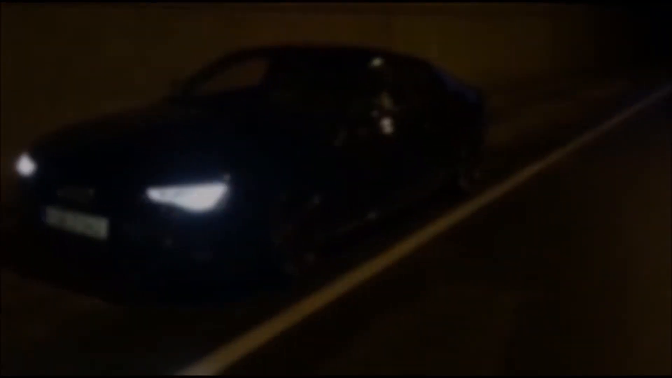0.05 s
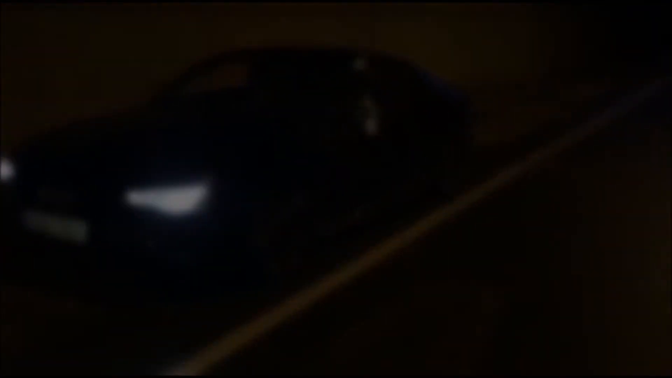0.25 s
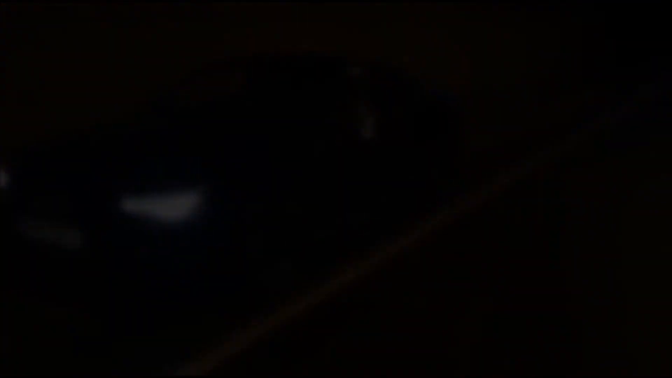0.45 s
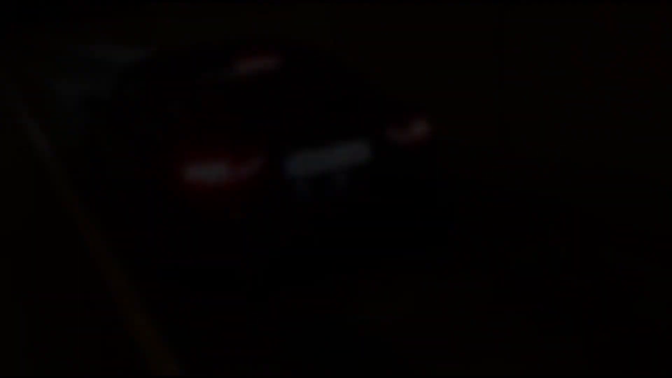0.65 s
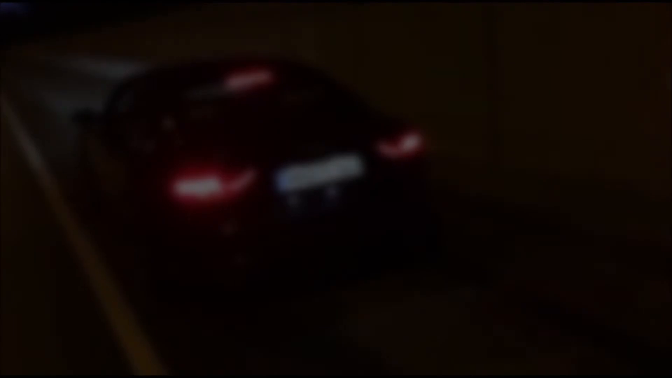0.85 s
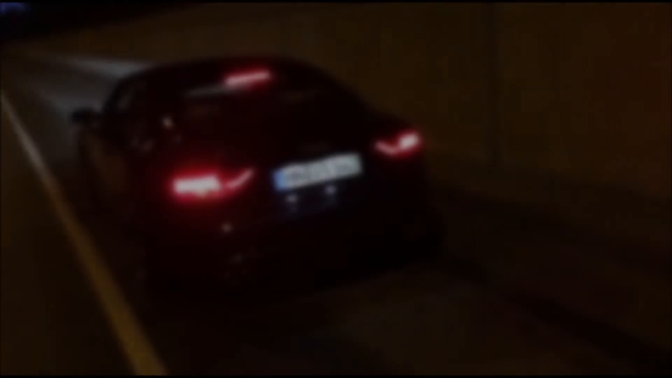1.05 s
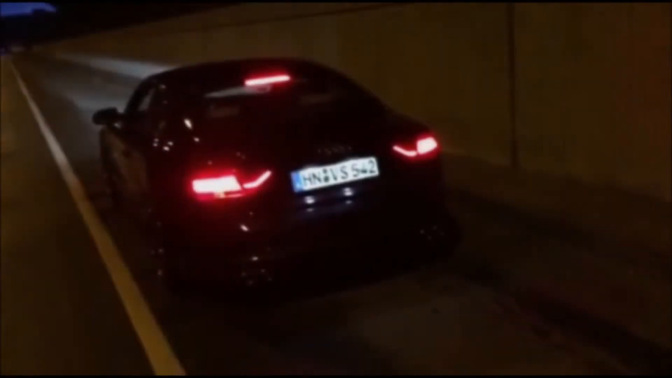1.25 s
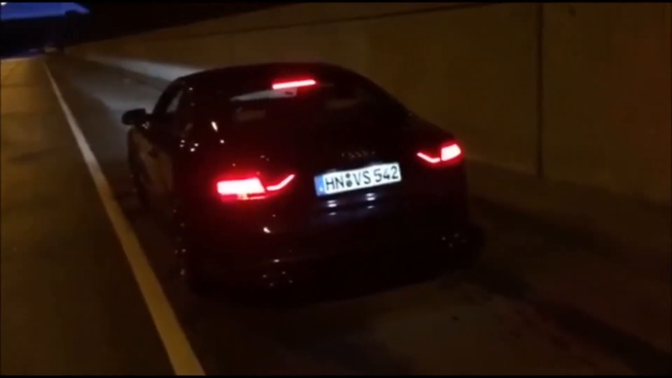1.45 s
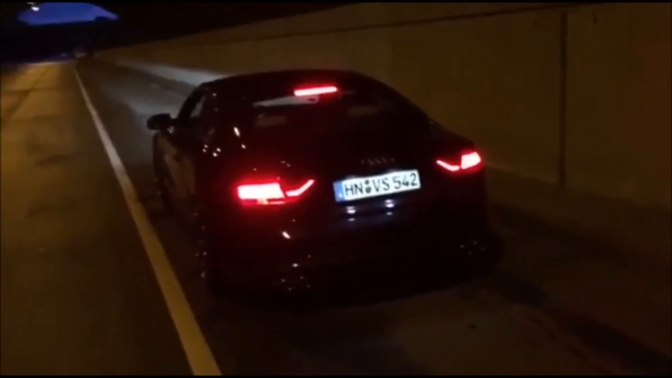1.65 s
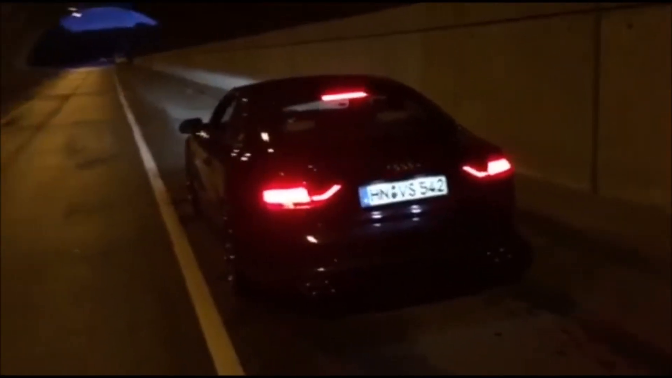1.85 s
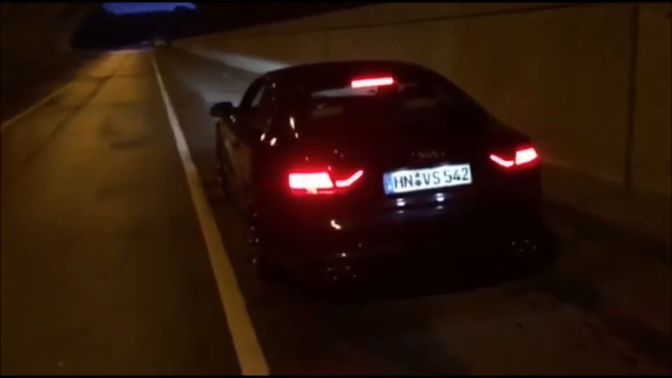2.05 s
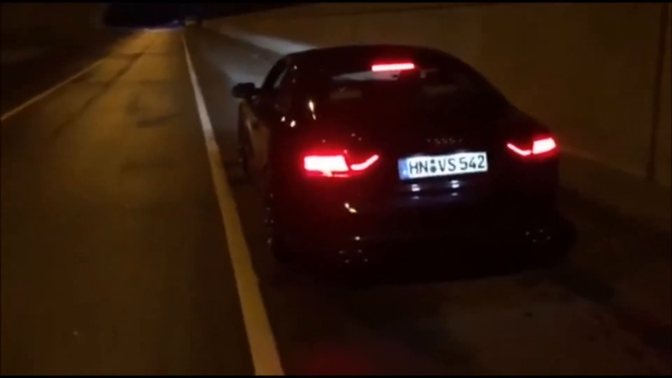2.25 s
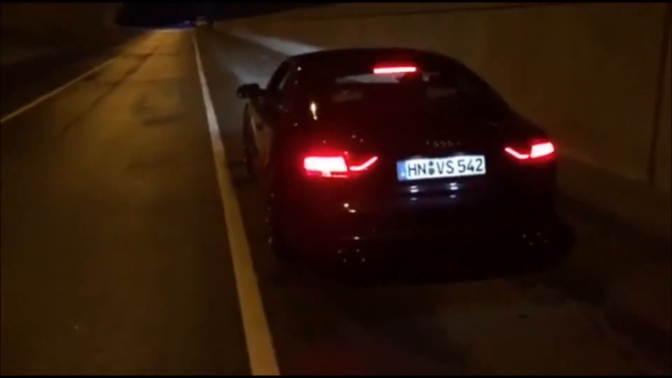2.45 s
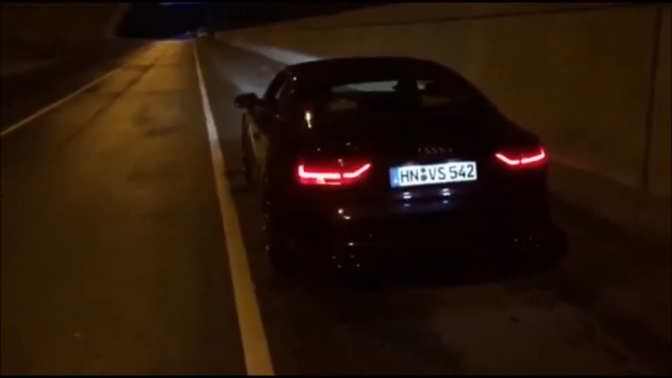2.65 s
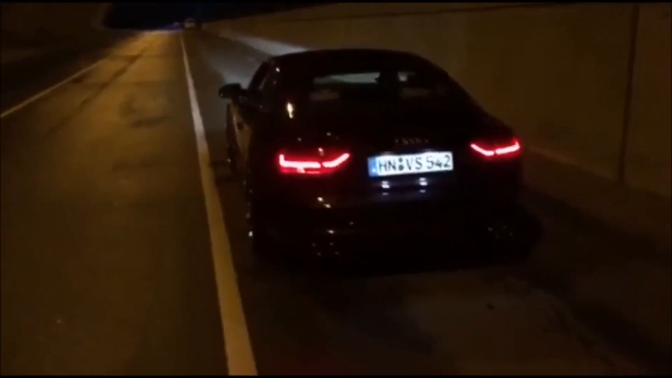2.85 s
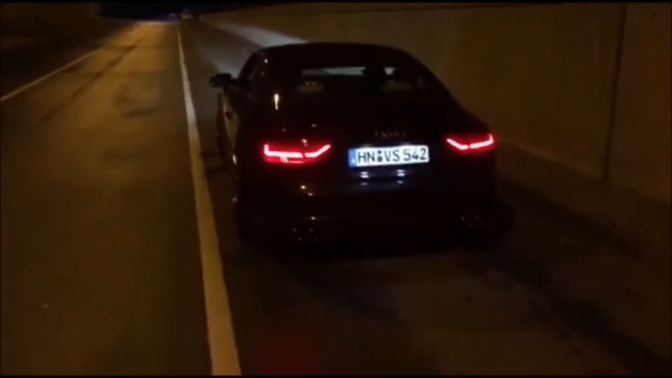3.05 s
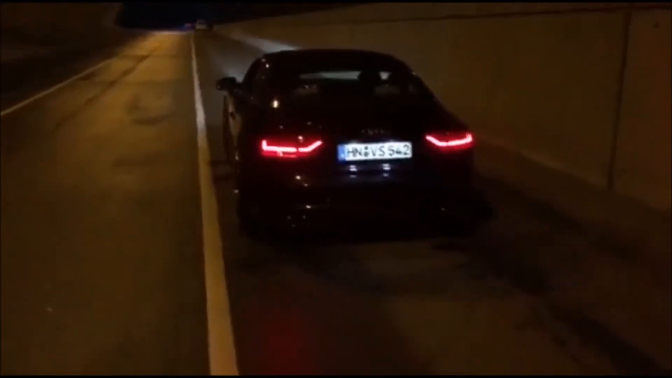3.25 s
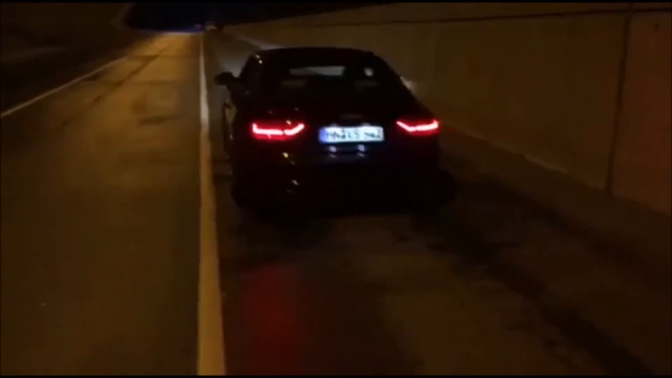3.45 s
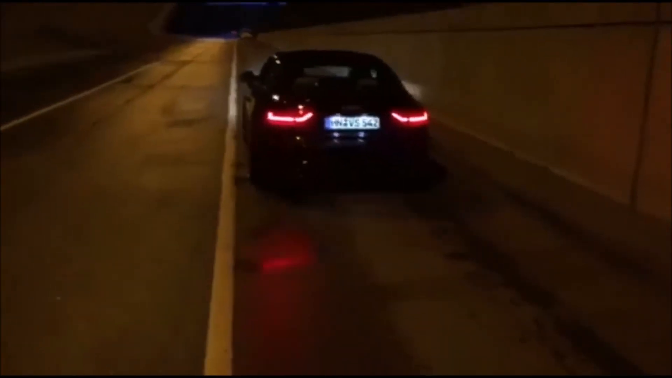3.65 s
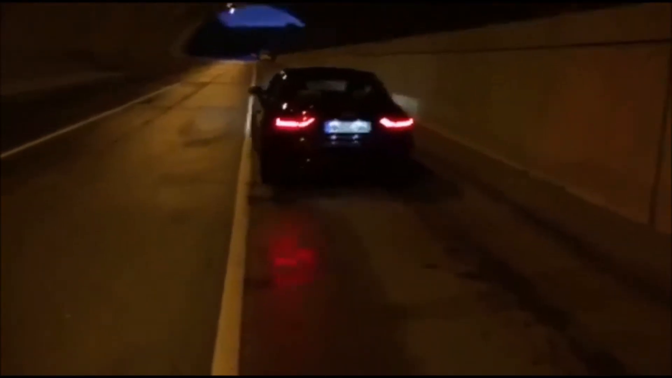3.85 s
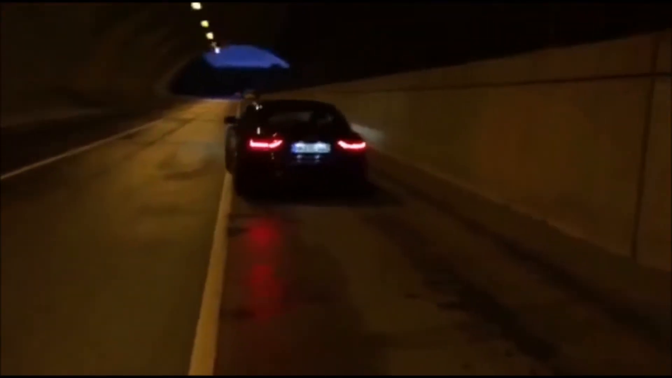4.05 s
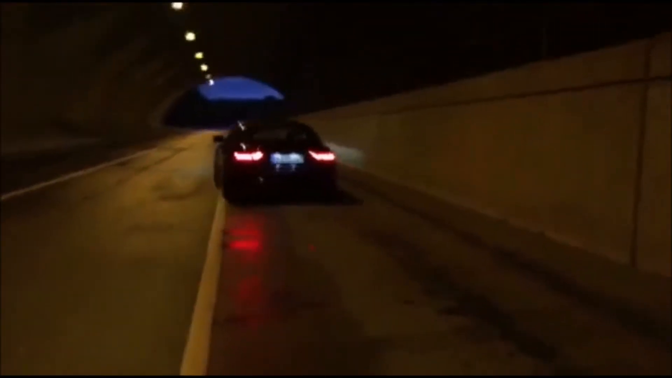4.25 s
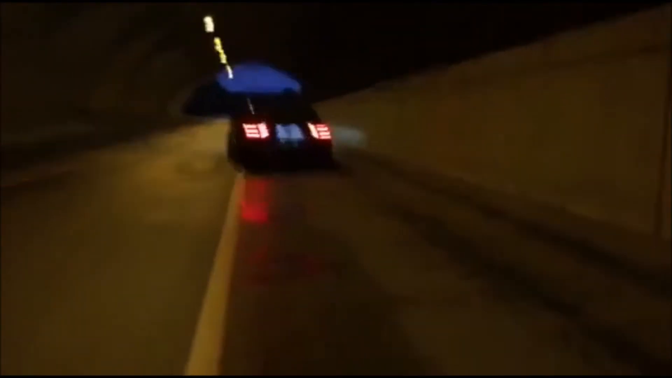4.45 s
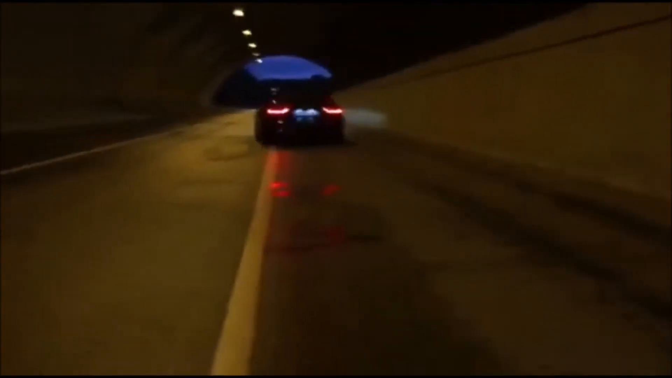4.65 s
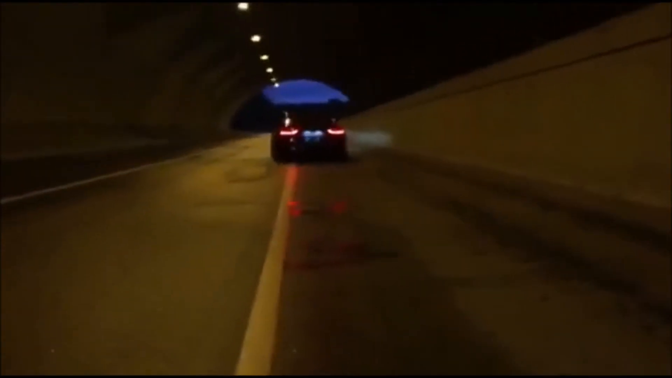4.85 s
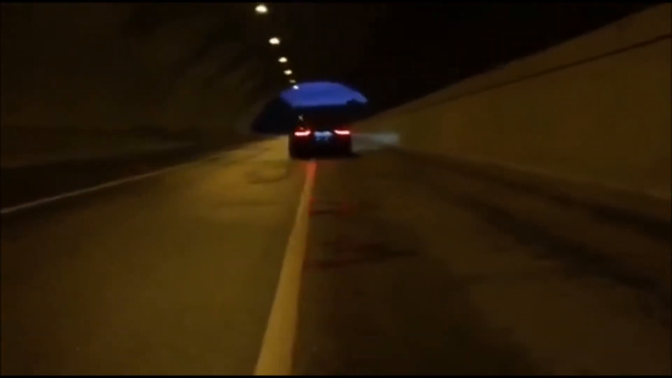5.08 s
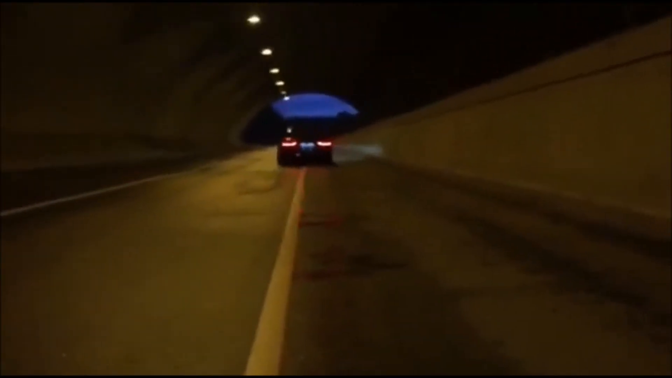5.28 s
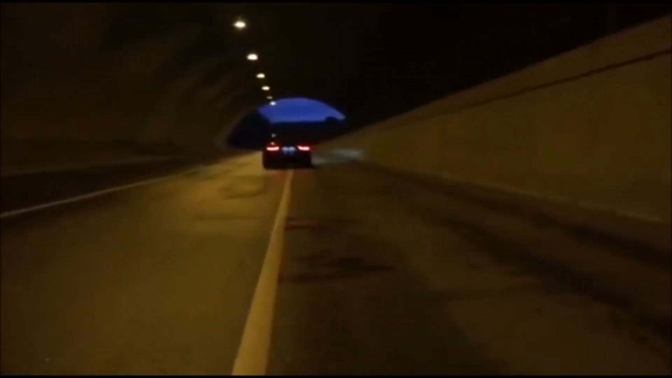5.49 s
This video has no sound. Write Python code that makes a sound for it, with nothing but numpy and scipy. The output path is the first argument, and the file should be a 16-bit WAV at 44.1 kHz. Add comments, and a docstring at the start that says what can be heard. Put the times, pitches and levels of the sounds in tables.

```python
"""A V8 sports car in a road tunnel idles and creeps past the microphone, then pulls away at full throttle. Its
uneven firing makes a stack of orders (multiples of the four-stroke cycle rate), coloured by the pipes. At idle
the exhaust burbles, the engine bay whirrs and metal ticks as the rear comes round to face us. Under load the
gas roars and rasps, the firings spit and some crack. Each crack comes again within a few milliseconds, and the
concrete tube's echo gains on the direct sound as the car draws away."""
import sys
import numpy as np
from scipy import signal
from scipy.fft import rfft, irfft, next_fast_len
from scipy.io import wavfile
from scipy.ndimage import uniform_filter1d, map_coordinates

SR = 44100
rng = np.random.default_rng(int(sys.argv[2]) if len(sys.argv) > 2 else 0)


def output_pcm(signal):
    """Save a mono or channel-first signal as 16-bit PCM at the path in sys.argv[1].

    Samples are clipped to [-1, 1] before scaling.
    """
    pcm = np.clip(np.atleast_2d(signal).T, -1, 1) * 32767
    wavfile.write(sys.argv[1], SR, np.round(pcm).astype(np.int16))


N = 243431
TIME = np.arange(N) / SR

# engine speed in four-stroke cycles a second, eight firings each: (time [s], speed [Hz])
IDLE_SPEED = [(0, 5.25), (.6, 5.3), (1.0, 5.9), (1.25, 5.36), (1.55, 5.36), (1.85, 5.28), (2.45, 5.24),
              (2.75, 5.36)]
TIP_IN_SPEED = [(2.82, 7.1), (2.9, 9.4)]
PULL_SPEED = [(3.0, 12.6), (3.08, 14.9), (3.15, 16.6), (3.23, 18.1), (3.45, 20.9), (3.97, 26.3),
              (4.24, 31.3), (4.49, 33.3), (4.61, 36.2), (5.0, 42.8), (5.43, 49.7), (5.52, 50.3)]
# pressure pulse of each firing in turn, led by the near bank's four uneven cylinders: (level [dB])
PULSE_DB = [-3, -14, 0, -3, -16, -2, -16, -14]
# gas puff of each firing in turn: (level [dB])
PUFF_DB = [-8, -15, -23, -16, -23, -11, -15, -11]
# the puffs trail the pulses at high revs: (speed [Hz], lag [cycles])
PUFF_LAG = [(22, 0), (31, .06)]
# the throttle opens on boom, bark and rasp, a row each: (start [s], full [s])
OPENING = [(2.84, 2.94), (2.888, 2.984), (2.824, 2.984)]
# balance at full throttle: (speed [Hz], boom [dB], bark [dB], rasp [dB])
LOAD = [(12.5, -10.5, -28, -38.5), (16, -11.5, -26, -43), (20, -16, -25, -38.5), (20.6, -13.5, -22, -36),
        (26.8, -17, -20.5, -37), (28.97, -18.5, -17, -33), (39, -21, -17, -30), (48.3, -20, -15.5, -27.5),
        (61.6, -15, -30, -32.5)]
# ragged gas: (speed [Hz], churn under the boom [dB], roar under the bark [dB], treble fizz [dB])
TURBULENCE = [(11.1, -19.5, -1.5, 2), (22, -16.5, -11.5, -9), (36.4, -1, -10, -0.5), (49.4, -7, -7, 2)]
# orders between their swells, from the second up: (level [dB])
ORDER_DB = [-12.5, -6.5, -4, -8.5, -0.5, -17.5, -0.5, 3, -3.5, -11.5, 1, 1, -1.5, -3, -5, 4, -7.5, 1.5, 0.5,
            4, 3, -6.5, -3.5, -3, 6.5, 6, -8.5, 2.5, 6.5, 1, 0, -4, -10.5, 4, 3]
# an order meets a resonance of pipes or tunnel: (order, speed [Hz], half-width [Hz], level [dB])
SWELLS = [(2, 46, 12, 2), (3, 22, 5, 4.5), (4, 27, 2.6, 4.5), (4, 48, 5, 1.5), (5, 19.6, 9.6, 13),
          (5, 48, 7.5, 9), (6, 21.6, 5, 11), (6, 48, 2.6, 5.5), (7, 25, 4.5, -2.5), (8, 9, 9.5, 18),
          (8, 25.8, 12.4, 10), (8, 46, 3.7, 5), (9, 21, 8.2, 2.5), (11, 24, 6.2, 0), (13, 13.4, 6, 14.5),
          (13, 40.5, 13, 4.5), (14, 32.1, 9.7, 11.5), (14, 53.2, 11, 17), (16, 46, 4, 6), (17, 22, 4, 11.5),
          (17, 35.14, 6.1, 17), (19, 26, 3, 14), (19, 48, 4.4, 17), (20, 30, 1.7, 12.5), (22, 34, 5, 14),
          (22, 43.5, 2, 9.5), (23, 22, 1.7, 17), (24, 26, 2.1, 9), (25, 31, 9.5, 11.5), (26, 21, 7.3, 11.5),
          (26, 41.5, 7.9, 8.5), (26, 49.5, 3.5, 12), (29, 30.4, 0.89, 20), (29, 35.6, 0.38, 20),
          (31, 24, 1.9, 14.5), (31, 33, 1.2, 12), (34, 28.7, 4, 16), (36, 31, 1.1, 12.5),
          (36, 46.9, 1.7, 13.5)]
# the orders above THUMP_ORDER are weak at the launch: (speed [Hz], gain [dB])
OVERTONES, THUMP_ORDER = [(9, -12), (13, -6), (22, 0)], 17
# colour of the exhaust pipes, before heat shifts it: (frequency [Hz], gain [dB])
PIPE_COLOUR = [(40, -10), (70, 3), (110, 4), (165, 5), (205, 2.5), (255, 0), (300, 0), (370, -3.5),
               (480, -5.5), (620, -1.5), (780, -6.5), (1020, -6.5), (1180, -12.5), (1330, -20), (1650, -7),
               (1950, -18.5), (2250, -5), (2800, -8.5), (4000, -34)]
# colours of gas roar, tailpipe rasp and cracks: (frequency [Hz], gain [dB])
GAS_COLOUR = [(15, -61.5), (25, -5), (79, 9), (119, 4), (199, 12), (300, -17), (381, -20.5), (618, -16),
              (786, -21.5), (895, -9), (1040, -14.5), (1320, -21.5), (1620, -17.5), (1840, -31),
              (2100, -38.5), (2730, -73.5), (4620, -100)]
RASP_COLOUR = [(1500, -11.5), (1950, -2.5), (2300, -1), (2650, -2), (3000, -5), (3500, -9), (3900, -7),
               (4700, -12), (5500, -10), (7000, -11.5), (7900, -22.5)]
CRACK_COLOUR = [(800, 9), (2000, -10.5), (3400, -5), (5000, -6), (7800, -20.5)]
# hard firings: thuds at the launch, then mid-range pops, and sharp cracks: (time [s], relative level [dB])
THUDS = [(2.85, -15.5), (2.883, -7), (2.927, -11.5), (2.964, -1), (3.028, -11)]
POPS = [(3.612, -12), (3.741, -12), (3.783, -11), (3.823, -13), (3.994, -12)]
CRACKS = [(2.9532, -24), (3.0154, -35), (3.0851, -21), (3.208, -27), (3.416, -28.5), (3.465, -12.5),
          (3.513, -18), (3.558, -24.5), (3.648, -14.5), (3.69, -17.5), (3.733, -16.5), (3.775, -18.5),
          (3.856, -25), (3.975, -20), (4.0146, -14), (4.152, -16), (4.1864, -9), (4.248, -8),
          (4.2835, -15.5), (4.3695, -17.5), (5.0404, -16), (5.125, -6.5), (5.1726, -14), (5.2375, -16),
          (5.2582, -13.5), (5.2809, -12), (5.322, -27.5)]
# ring of pipes and tunnel at a thud, and of a pop: (frequency [Hz], level [dB], t60 [s])
THUD_MODES = [(90.5, 2.5, 0.13), (203.2, -11.5, 0.54), (551, -15.5, 0.084)]
POP_MODES = [(590, 4, 0.023), (720, -2, 0.022), (950, -6.5, 0.027)]

# the idling car creeps past the microphone: (time [s], exhaust burble [dB], engine bay whirr [dB])
IDLE_LEVELS = [(0, -38.5, -54.5), (1.1, -40, -56.5), (1.25, -30.5, -55), (1.9, -31, -54),
               (2.75, -26.5, -51.5)]
# the tailpipes come to face the microphone: (time [s], share heard from behind [0-1])
BEHIND = [(.85, 0.25), (1.25, 0.65)]
# lines of the idling exhaust: (order, level [dB])
IDLE_ORDERS = [(8, -15), (11, -10), (13, -3), (15, -12), (16, 1), (17, -12), (18, -17), (19, -13),
               (21, -13), (24, -12), (29, -18), (33, -23), (37, -14), (40, -6), (41, -16), (42, -16),
               (43, -21), (47, -27)]
# colours of the idle rumble and of the engine bay from front and rear: (frequency [Hz], gain [dB])
RUMBLE_COLOUR = [(12, -59.5), (20, -33), (43, 4.5), (62, 6.5), (80, 9), (156, -3.5), (222, -8), (239, -6),
                 (289, -17), (400, -23.5), (520, -66.5), (880, -120)]
WHIRR_FRONT = [(180, -40.5), (300, 3), (359, -4.5), (384, -34.5), (417, -8.5), (588, 3), (1090, -18.5),
               (1320, -10.5), (1580, -20.5), (1940, -14), (2450, -25), (3300, -27.5), (3850, -29),
               (4370, -30.5), (8000, -38.5), (10400, -68), (17600, -120)]
WHIRR_BEHIND = [(180, -32.5), (300, -16), (389, -8), (499, 5.5), (733, -14), (1060, 2), (1320, -5),
                (1670, -5), (1970, -14.5), (3320, -23), (3810, -33), (4370, -25), (5670, -37),
                (6600, -29.5), (8000, -37), (10400, -78), (17600, -120)]
# narrow resonances of the engine's metal parts: (frequency [Hz], level against the whirr [dB])
BAY_MODES = [(1044, -8.5), (1604, -2.5), (1719, -5), (2074, -1), (2369, -2.5), (2913, -2.5), (3343, 2.5),
             (4266, -2.5), (4340, 3), (4760, -11)]
# metallic ticks under the rear of the car: (time [s], relative level [dB])
TICKS = [(.82, -68), (1.025, -69), (1.145, -66), (1.21, -59), (1.325, -67), (1.395, -62), (1.513, -58),
         (1.58, -57.5), (1.697, -60), (1.768, -55.5), (1.887, -57.5), (1.957, -55.5), (2.077, -57),
         (2.146, -59), (2.272, -55), (2.338, -55), (2.53, -57.5), (2.65, -54.5), (2.718, -57)]
# colour of a tick's contact: (frequency [Hz], gain [dB])
TICK_COLOUR = [(2000, -18), (2700, -9), (3200, 0), (3750, -5), (4400, -1), (5000, -5), (5600, -15),
               (6600, -10), (7800, -18)]
# ring of the ticking metal: (frequency [Hz], level [dB], t60 [s])
TICK_MODES = [(2900, -5, 0.15), (3170, -6, .12), (3340, -4.5, 0.12), (4200, -2, .16), (4230, -2.5, 0.12),
              (4530, -5.5, 0.14), (4700, -6.5, 0.067), (5100, -5.5, 0.12), (5680, -16, .14),
              (6370, -12, 0.15), (6600, -16.5, 0.17), (7240, -18, 0.18)]
# each tick rattles on: (delay [s], level [dB])
RATTLE = [(.006, -3), (.014, -6)]

# each crack comes again twice within a few milliseconds: (delay [s], level [dB])
CRACK_REPEATS = [(.007, -8.5), (.011, -9)]
# decay of the tunnel: (frequency [Hz], t60 [s])
TUNNEL_DECAY = [(80, 2.4), (500, 2.9), (2000, 2.3), (8000, 0.28)]
# echo against the direct exhaust note as the distance grows: (time [s], level [dB])
ECHO = [(2.9, -11), (3.7, -10.5), (4.3, -6.5), (5.5, -3.5)]

LAUNCH_S, FIRST_FIRING_S = 3, 3.466  # the pull begins; a moment when a cycle starts
HEAT, HEAT_PER_S = 0.92, 0.042  # hotter gas raises the pipe resonances: factor at launch, and its rise
TOP_DB, TOP_SPREAD_DB = -2, 3  # orders beyond ORDER_DB are uneven
TOP_ORDER, TOP_DB_PER_ORDER = 58, -0.6125  # and the highest fade out
FLUTTER_DB, FLUTTER_ORDER = 3.4, 15  # orders below this one hold steadier
SMEAR_RAD, DRAG_HZ = .8, 330  # the pipes smear the pulses and draw their treble into chirps
SURGE_DB, SURGE_LAG_CYCLES = 1.5, .28  # the bark surges once a cycle
SPUTTER_DB, SPUTTER_HZ = 1.44, 12  # the rasp comes in uneven clumps
SPIT_DB, SPIT_SPREAD_DB = -7, 4  # spits against the rasp
BAY_HALF_WIDTH_HZ = 24
IDLE_FADE_DB_PER_S = 17.5


def full_throttle(turns, speed):
    """The exhaust heard from behind as the car leaves: deep boom, bark, rasp and hard firings."""
    opening_db = [throttle_opening(*row) for row in OPENING]
    boom_db, bark_db, rasp_db = np.array(by_speed(LOAD, speed)) + opening_db
    churn_db, roar_db, fizz_db = by_speed(TURBULENCE, speed)
    echo = amp(curve(ECHO))
    note = exhaust_note(turns, speed) * amp(opening_db[0])
    note *= 1 + .2 * wander(90)  # no two firings burn alike
    note += echo * tunnel(note)
    gas = coloured(puffs(turns, floor=1, fade=.58), GAS_COLOUR)
    lowpass = lambda f: 1 / (1 + (f / 330) ** 8)
    deep_note, deep_gas = shaped(note, lowpass), shaped(gas, lowpass)
    boom = held(held(deep_note, 0) + amp(churn_db) * unit_rms(deep_gas), boom_db)
    bark = held(note - deep_note, 0) + amp(roar_db) * unit_rms(gas - deep_gas)
    surge_db = SURGE_DB * np.cos(2 * np.pi * (turns - SURGE_LAG_CYCLES))
    bark = held(bark, bark_db + surge_db)
    puff_turns = turns - by_speed(PUFF_LAG, speed)[0]
    rasp = held(tailpipe_rasp(puff_turns, echo, fizz_db), rasp_db + SPUTTER_DB * wander(SPUTTER_HZ))
    thuds = struck(THUDS, THUD_MODES, rise_s=.0045)
    pops = struck(POPS, POP_MODES, rise_s=.00067)
    return boom + bark + rasp + thuds + pops + exhaust_cracks(puff_turns, rasp_db, fizz_db)


def exhaust_note(turns, speed):
    """Firing pulses as a stack of orders, each swelling as the revs sweep it through a resonance."""
    heat = HEAT + HEAT_PER_S * np.maximum(TIME - LAUNCH_S, 0)
    overtones_db, = by_speed(OVERTONES, speed)
    pulse_phase = np.angle(np.fft.fft(-amp(PULSE_DB)))
    note = np.zeros(N)
    for k in range(2, 85):
        top_db = TOP_DB + TOP_DB_PER_ORDER * max(k - TOP_ORDER, 0)
        top_db += TOP_SPREAD_DB * rng.standard_normal()
        base_db = ORDER_DB[k - 2] if k - 2 < len(ORDER_DB) else top_db
        swells = sum(amp(db) * np.exp(-((speed - peak) / width) ** 2)
                     for order, peak, width, db in SWELLS if round(order) == k)
        hz = k * speed
        flutter_db = FLUTTER_DB * min(k / FLUTTER_ORDER, 1) * wander(14)
        gain = amp(overtones_db * (k > THUMP_ORDER) + by_frequency(PIPE_COLOUR, hz / heat) + flutter_db)
        gain /= 1 + (hz / 2800) ** 4
        phase = pulse_phase[k % len(PULSE_DB)] + SMEAR_RAD * rng.standard_normal() - (hz / DRAG_HZ) ** 2
        note += np.hypot(amp(base_db), swells) * gain * np.cos(2 * np.pi * k * turns + phase)
    return note


def throttle_opening(start, full):
    """A layer's swell in dB as the throttle opens."""
    return np.maximum(-17.5 * np.maximum(full - TIME, 0) / (full - start), -120)


def puffs(turns, floor, fade):
    """Turbulent gas, let out anew at each firing; fade is in firing intervals."""
    firing, age = np.divmod(turns * len(PUFF_DB), 1)
    firing = firing.astype(int)
    size_db = np.array(PUFF_DB)[firing % len(PUFF_DB)] + 18 * (rng.random(2048) - .5)[firing]
    return (floor + amp(size_db) * np.exp(-age / fade)) * rng.standard_normal(N)


def tailpipe_rasp(turns, echo, fizz_db):
    """Hissing gas pulses ring the tailpipes; most of the flow repeats each cycle, so it is pitched."""
    pattern = rng.standard_normal(900)
    buzz = unit_rms(np.interp(turns % 1 * len(pattern), np.arange(len(pattern)), pattern))
    firing, age = np.divmod(turns % 1 * len(PUFF_DB), 1)
    gate = .16 + amp(PUFF_DB)[firing.astype(int) % len(PUFF_DB)] * np.exp(-age / .44)
    loose_hiss = amp(-1.5) * unit_rms(puffs(turns, floor=.1, fade=.23))
    flow = pipe_ring(unit_rms(gate * buzz) + loose_hiss, t60=.02, share=.3)
    rasp = brightened(coloured(flow, RASP_COLOUR), fizz_db)
    return wall_patches(rasp + amp(-2) * echo * tunnel(rasp), depth_db=3.8, width_hz=85, hold_s=.06)


def exhaust_cracks(turns, rasp_db, fizz_db):
    """The firings spit and a few crack loudly; each crack comes again within milliseconds and the tunnel
    answers."""
    firing = np.floor(turns * len(PUFF_DB)).astype(int)
    clicks = np.diff(firing, prepend=firing[0]) * amp(PUFF_DB)[firing % len(PUFF_DB)]
    throttle_open = TIME > OPENING[0][1]
    clicks *= throttle_open * amp(SPIT_SPREAD_DB * np.clip(rng.standard_normal(N), -2, 2))
    spits = unit_rms(pipe_ring(coloured(clicks, CRACK_COLOUR), t60=.0036, share=3.2))
    cracks = amp(rasp_db + SPIT_DB) * spits + amp(9.5) * bursts(CRACKS, CRACK_COLOUR, t60=.0076)
    near = repeated(brightened(cracks, fizz_db), CRACK_REPEATS)
    return near + amp(-5.5) * tunnel(near)


def pipe_ring(x, t60, share):
    """The steel pipes ring with many close, narrow modes."""
    t = np.arange(4000) / SR
    ring = rng.standard_normal(len(t)) * amp(-60 * t / t60)
    return x + share * signal.fftconvolve(x, ring / np.linalg.norm(ring))[:N]


def brightened(x, fizz_db):
    """Faster gas is brighter: lifts or lowers the top of the treble."""
    return x + shaped(x, lambda f: f ** 4 / (f ** 4 + 4500 ** 4)) * (amp(fizz_db) - 1)


def idle_burble(turns):
    """Wavering exhaust lines, standing clearer of the rumble as the tailpipes face the microphone."""
    lines = sum(amp(db) * (1 + .15 * wander(5.01)) * np.cos(2 * np.pi * (round(k) * turns + rng.random()))
                for k, db in IDLE_ORDERS)
    rumble = unit_rms(coloured(rng.standard_normal(N), RUMBLE_COLOUR))
    return held(unit_rms(lines) + amp(8.5 - 29.7 * curve(BEHIND)) * rumble, curve(IDLE_LEVELS))


def engine_bay(turns):
    """A whirr ringing in the engine's metal parts, changing colour as the car passes the microphone."""
    metal = lambda f: 1 + sum(amp(db) / (1 + ((f - hz) / BAY_HALF_WIDTH_HZ) ** 2) for hz, db in BAY_MODES)
    churn = shaped(puffs(turns, floor=1, fade=.5), metal)
    churn = wall_patches(churn, depth_db=3.2, width_hz=70, hold_s=.08)
    front, rear = unit_rms(coloured(churn, WHIRR_FRONT)), unit_rms(coloured(churn, WHIRR_BEHIND))
    behind = curve(BEHIND)
    return amp(curve(IDLE_LEVELS, column=2)) * ((1 - behind) * front + behind * rear)


def metal_ticks():
    """Light contacts under the rear of the car ring and rattle on."""
    contacts = amp(3) * bursts(TICKS, TICK_COLOUR, t60=.05)
    rings = amp(-15) * struck(TICKS, TICK_MODES, rise_s=.001)
    return wall_patches(repeated(contacts + rings, RATTLE), depth_db=3.5, width_hz=110, hold_s=.1)


def tunnel(x):
    """The concrete tube's echo, as strong as x: sparse reflections, each band dying at its own rate."""
    taps = rng.choice([-1., 1.], 2 * SR) * (rng.random(2 * SR) < 3000 / SR)
    hz, t, spectrum = signal.stft(taps, SR, nperseg=256)
    decay = amp(-60 * t / by_frequency(TUNNEL_DECAY, hz)[:, None])
    tail = signal.istft(spectrum * decay, SR, nperseg=256)[1]
    return unit_rms(signal.fftconvolve(x, tail)[:N]) * np.std(x)


def wall_patches(x, depth_db, width_hz, hold_s):
    """Wall reflections add and cancel at the microphone in shifting patches of frequency."""
    hz, t, spectrum = signal.stft(x, SR, nperseg=1024, noverlap=768)
    grid = np.meshgrid(t / hold_s, hz / width_hz)
    patches = map_coordinates(rng.standard_normal((256, 256)), grid, order=1, mode="wrap")
    return signal.istft(spectrum * amp(depth_db * unit_rms(patches)), SR, nperseg=1024, noverlap=768)[1][:N]


def struck(events, modes, rise_s):
    """Each event knocks a set of modes, never quite alike."""
    out, t = np.zeros(N), np.arange(SR // 4) / SR
    hz, mode_db, t60 = np.transpose(modes)[:, :, None]
    for (s, db), (loudness, tuning) in zip(events, rng.standard_normal((64, 2, len(modes), 1))):
        envelopes = amp(db + mode_db + 3 * loudness - 60 * t / t60)
        rings = envelopes * np.sin(2 * np.pi * hz * (1 + .005 * tuning) * t)
        add(out, s, rings.sum(0) * (1 - np.exp(-t / rise_s)))
    return out


def bursts(events, colour, t60):
    """A short burst of noise at each event."""
    out, t = np.zeros(N), np.arange(3000) / SR
    for (s, db), noise in zip(events, rng.standard_normal((128, len(t)))):
        add(out, s, amp(db - 60 * t / t60) * noise)
    return coloured(out, colour)


def repeated(x, taps):
    """Adds delayed copies."""
    out = x.copy()
    for delay, db in taps:
        add(out, delay, amp(db) * x)
    return out


def add(mix, s, sound):
    """Mixes a sound in at s seconds."""
    part = mix[round(s * SR):][:len(sound)]
    part += sound[:len(part)]


def amp(db):
    """Decibels to gain."""
    return 10 ** (np.asarray(db) / 20)


def curve(rows, column=1):
    """One column of a time table, at every sample."""
    rows = np.array(rows)
    return np.interp(TIME, rows[:, 0], rows[:, column])


def by_speed(rows, speed):
    """Every column of an engine-speed table, at every sample."""
    at, *columns = np.transpose(rows)
    return [np.interp(speed, at, column) for column in columns]


def by_frequency(rows, hz):
    """Reads a table on a log-frequency axis."""
    f, value = np.transpose(rows)
    return np.interp(np.log(hz + 1), np.log(f + 1), value)


def shaped(x, gain):
    """Filters by a gain given as a function of frequency."""
    size = next_fast_len(len(x) + 8192)
    return irfft(rfft(x, size) * gain(np.fft.rfftfreq(size, 1 / SR)), size)[:len(x)]


def coloured(x, colour):
    """Filters by a colour table, falling away beyond its ends."""
    skirts = lambda f: np.minimum(f / colour[0][0], 1) ** 2 / np.maximum(f / colour[-1][0], 1) ** 6
    return shaped(x, lambda f: amp(by_frequency(colour, f)) * skirts(f))


def unit_rms(x):
    """Scales to rms 1."""
    return x / np.sqrt(np.mean(x ** 2) + 1e-20)


def wander(hz):
    """Random drift of rms 1, turning hz times a second."""
    knots = rng.standard_normal(1024)
    return unit_rms(np.interp(TIME * hz, np.arange(len(knots)), knots))


def held(x, db):
    """Makes the running level of x follow a curve."""
    power = uniform_filter1d(uniform_filter1d(x ** 2, size=4400), size=4400)
    return x * amp(db) / np.sqrt(abs(power) + 1e-14)


def scene():
    """From one spot in the tunnel: the idle passes, then dies away under the pull."""
    idle_turns = np.cumsum(curve(IDLE_SPEED) * (1 + .0018 * wander(72))) / SR
    speed = curve(IDLE_SPEED + TIP_IN_SPEED + list(PULL_SPEED))
    turns = np.cumsum(speed * (1 + .002 * wander(60))) / SR  # counts four-stroke cycles
    turns -= np.interp(FIRST_FIRING_S, TIME, turns) % 1
    idle = idle_burble(idle_turns) + engine_bay(idle_turns) + metal_ticks()
    lingering = amp(-IDLE_FADE_DB_PER_S * np.maximum(TIME - LAUNCH_S, 0))
    return (lingering * idle + full_throttle(turns, speed))[None]


def record(dry):
    """The mono microphone rounds off the highest peaks; the band ends at 8100 Hz."""
    rounded = dry / (1 + (dry / .8) ** 6) ** (1 / 6)
    lowpass = signal.firwin(401, 8100, window=("kaiser", 9), fs=SR)
    return signal.oaconvolve(rounded, lowpass[None], "same")


dry = scene()
out = record(dry)
output_pcm(out)
```